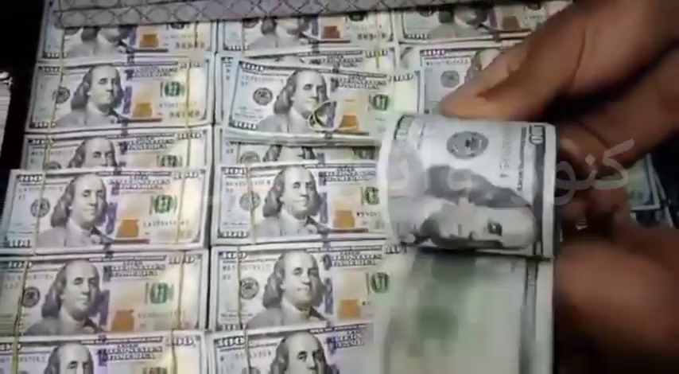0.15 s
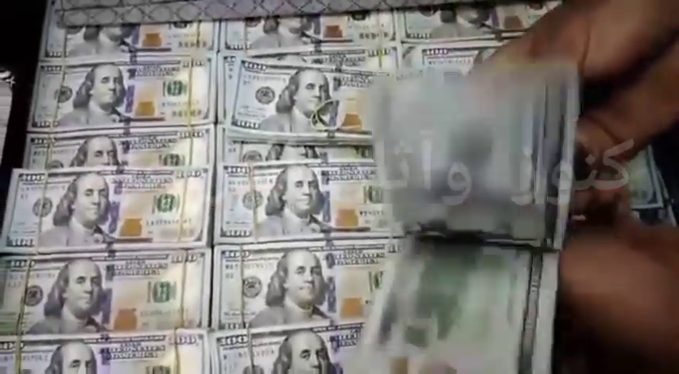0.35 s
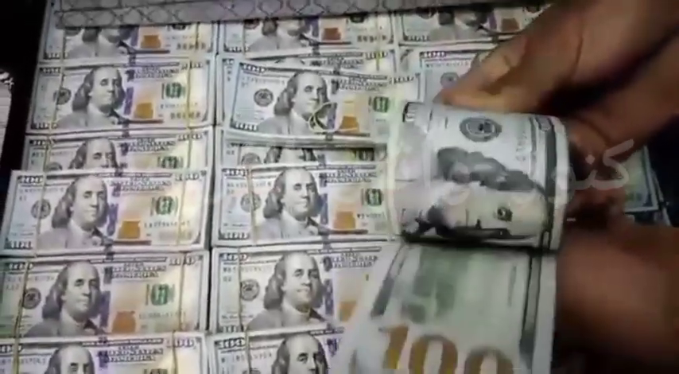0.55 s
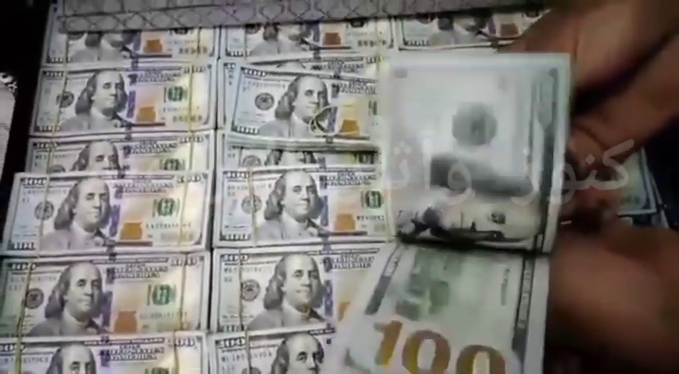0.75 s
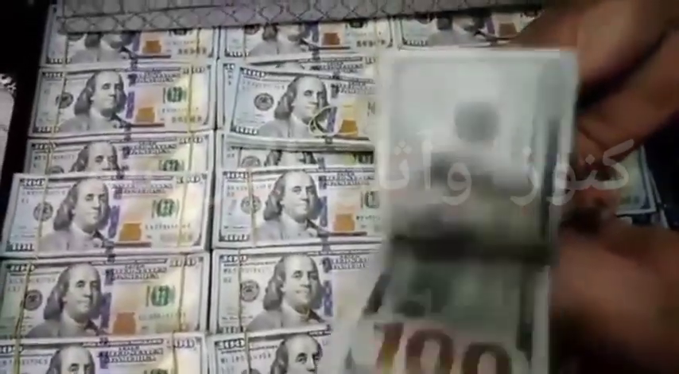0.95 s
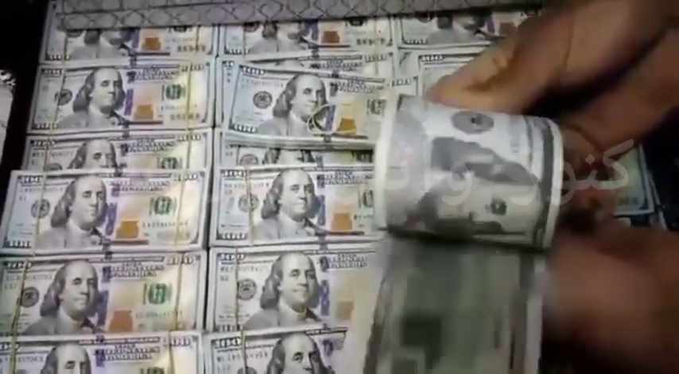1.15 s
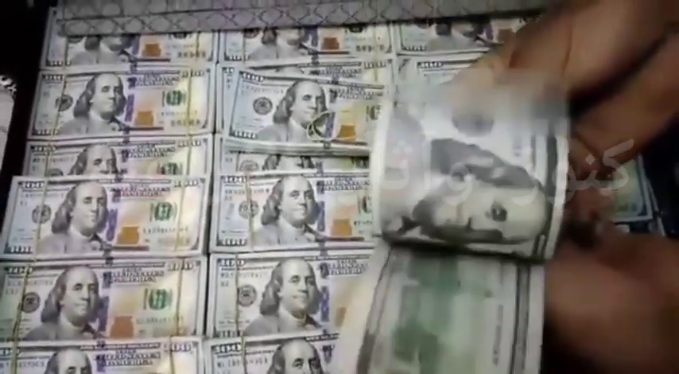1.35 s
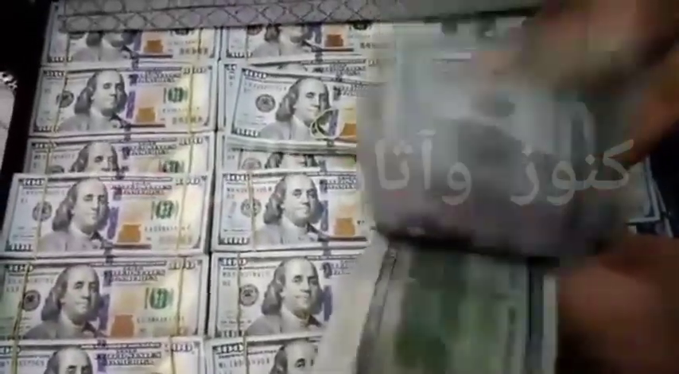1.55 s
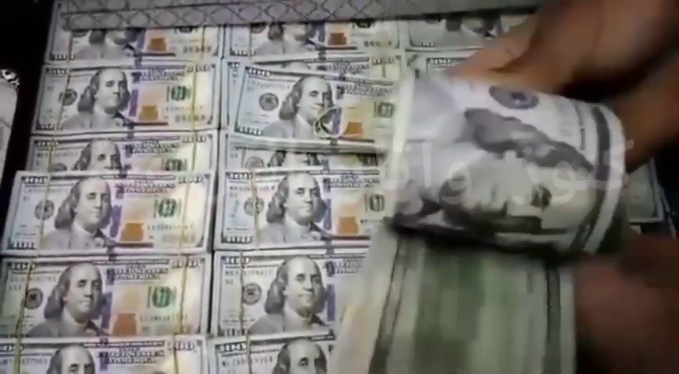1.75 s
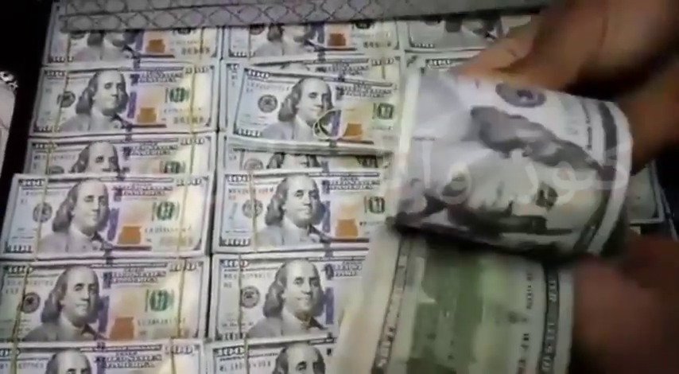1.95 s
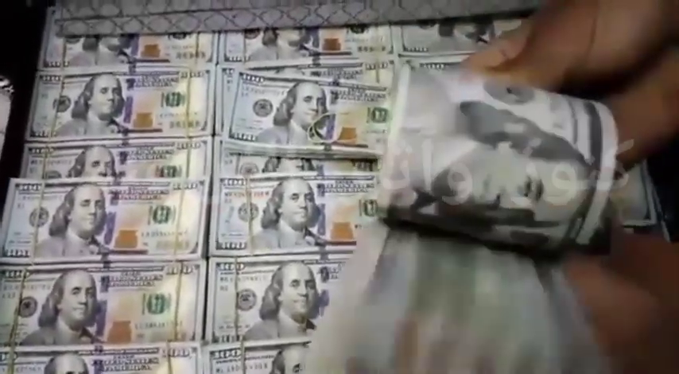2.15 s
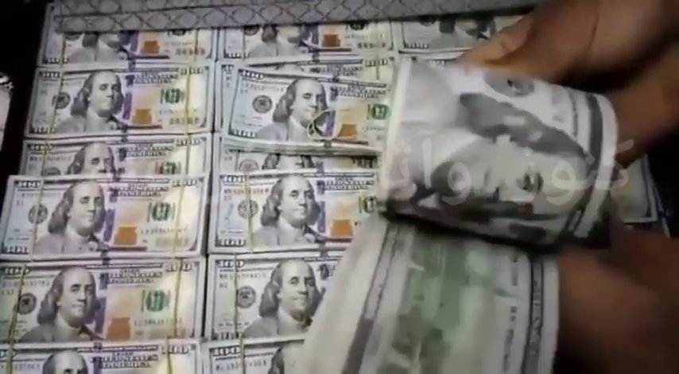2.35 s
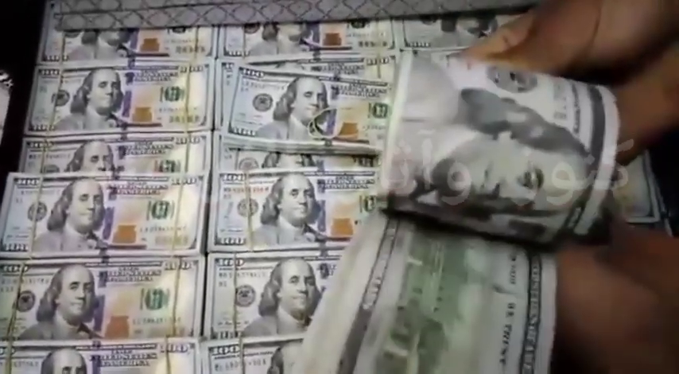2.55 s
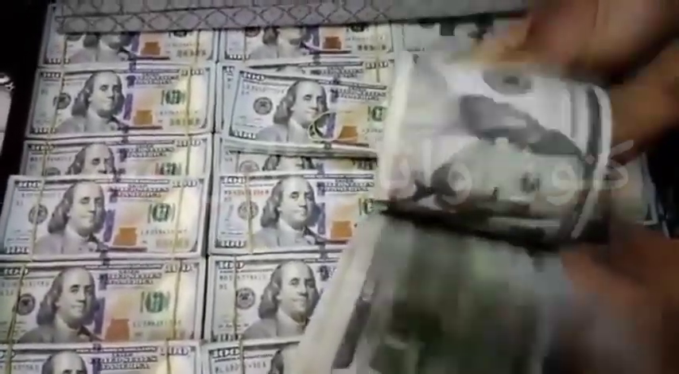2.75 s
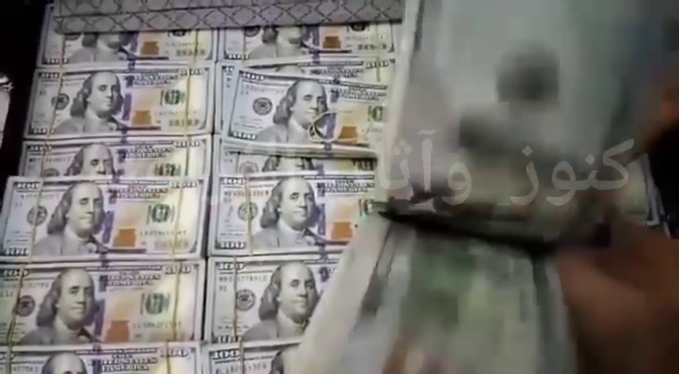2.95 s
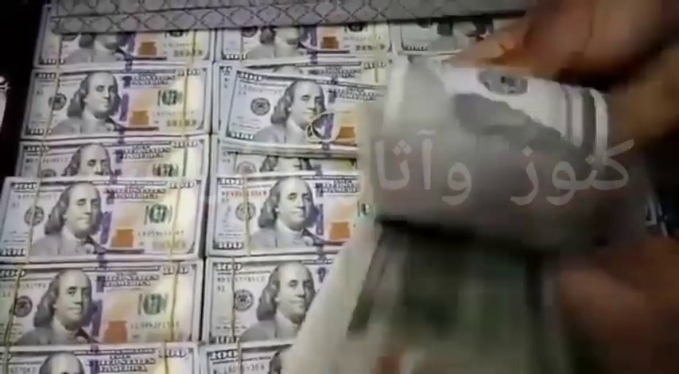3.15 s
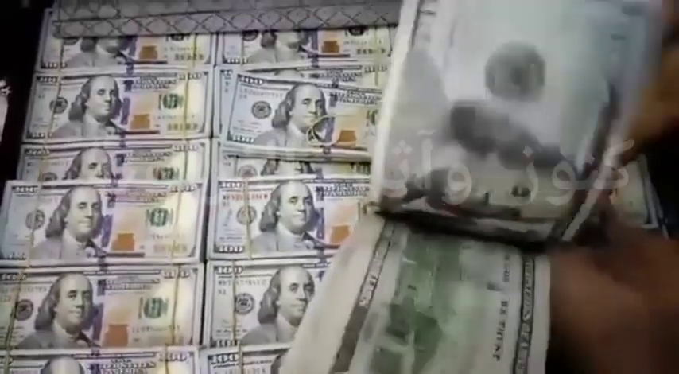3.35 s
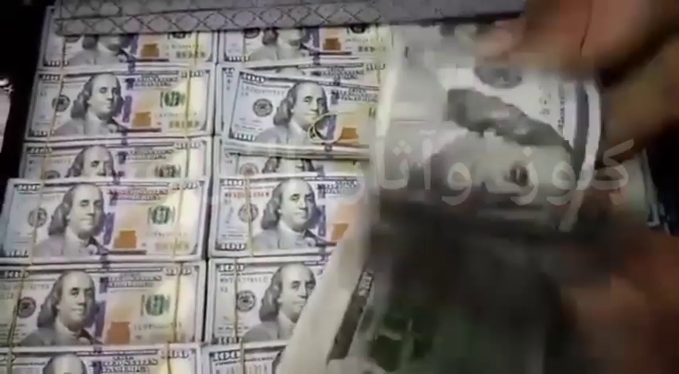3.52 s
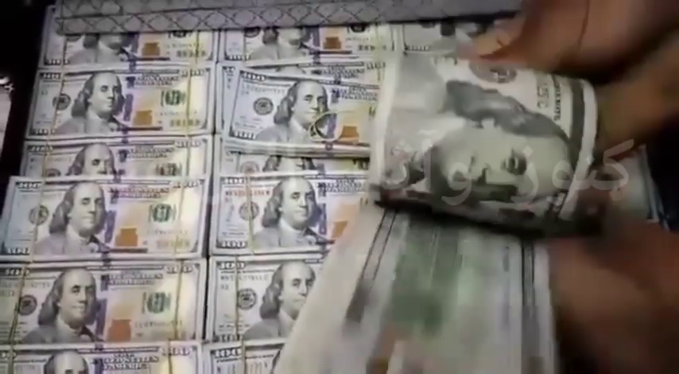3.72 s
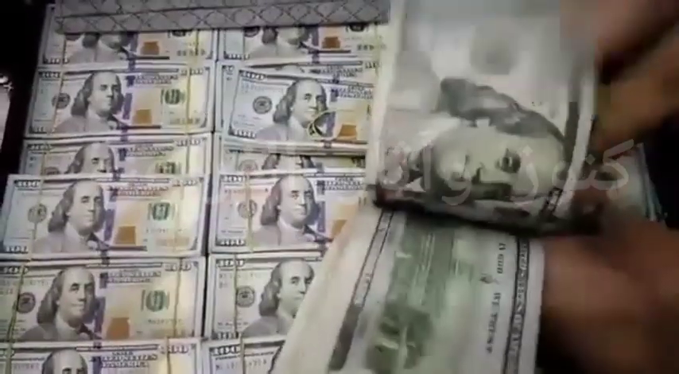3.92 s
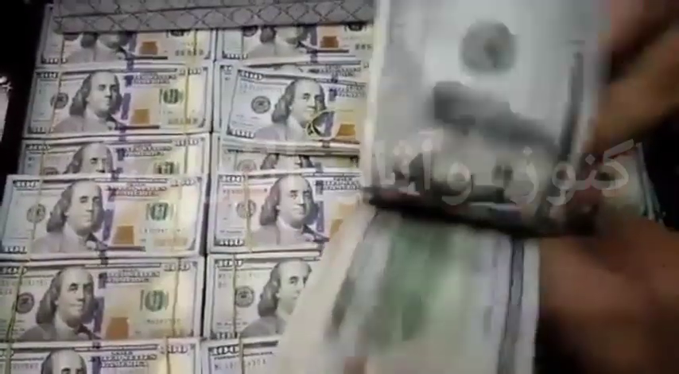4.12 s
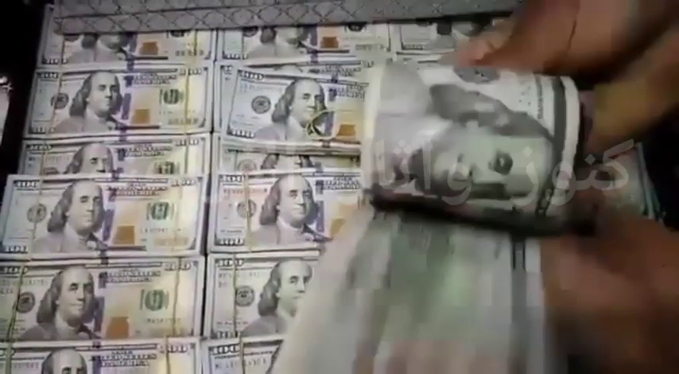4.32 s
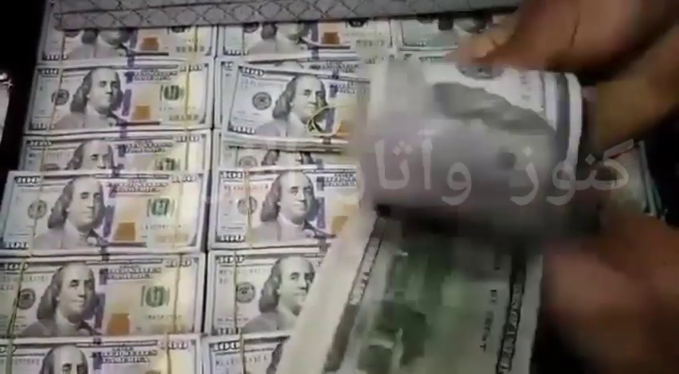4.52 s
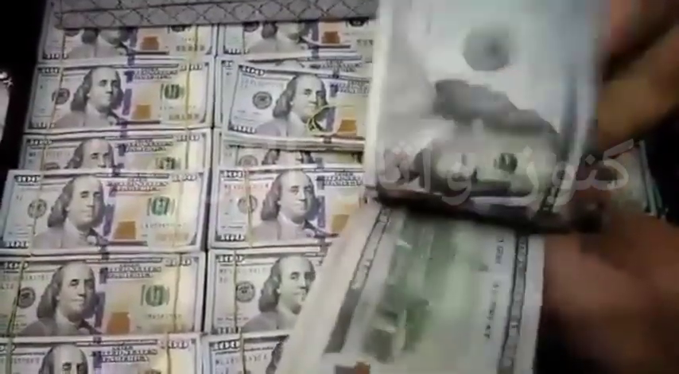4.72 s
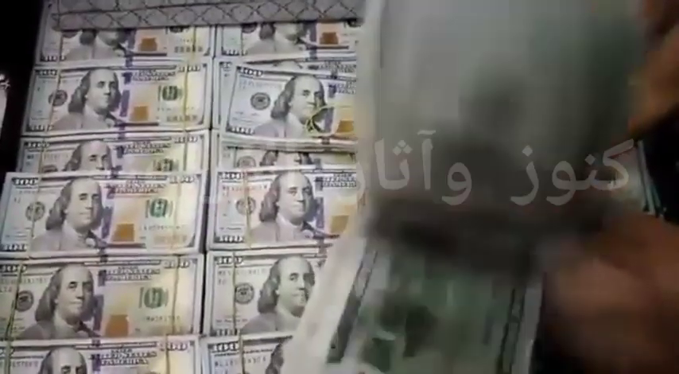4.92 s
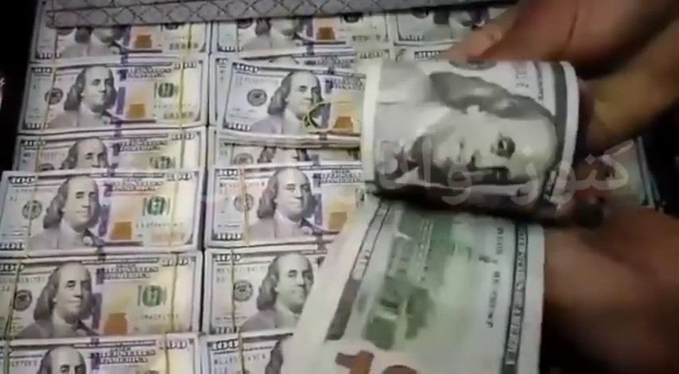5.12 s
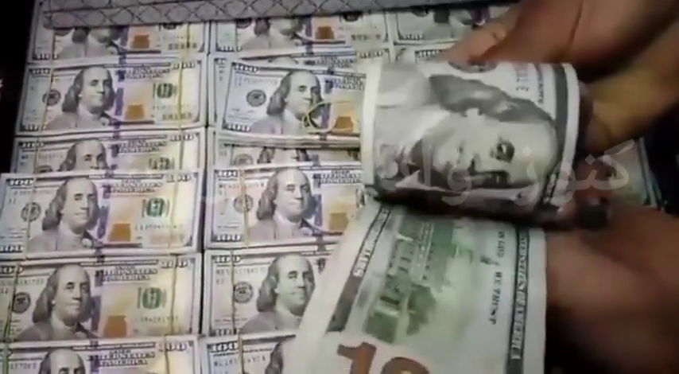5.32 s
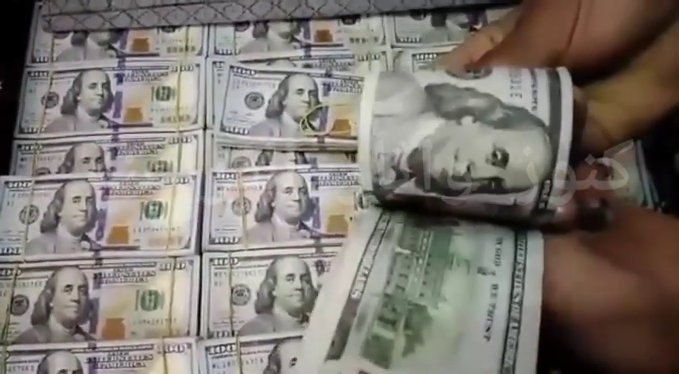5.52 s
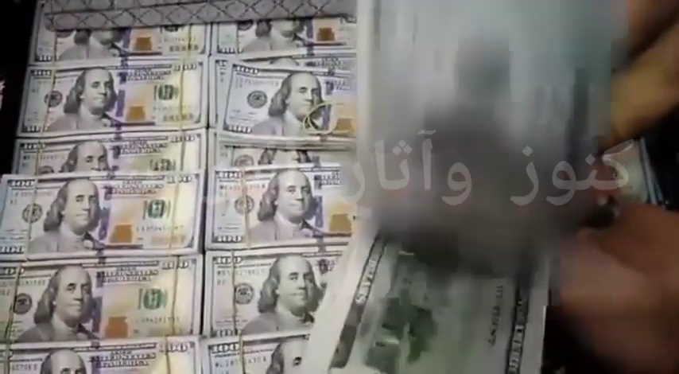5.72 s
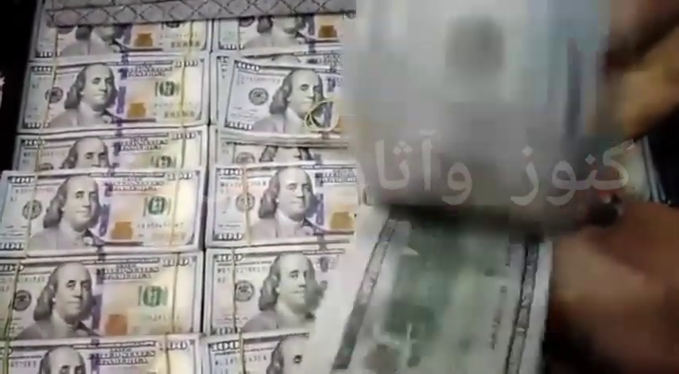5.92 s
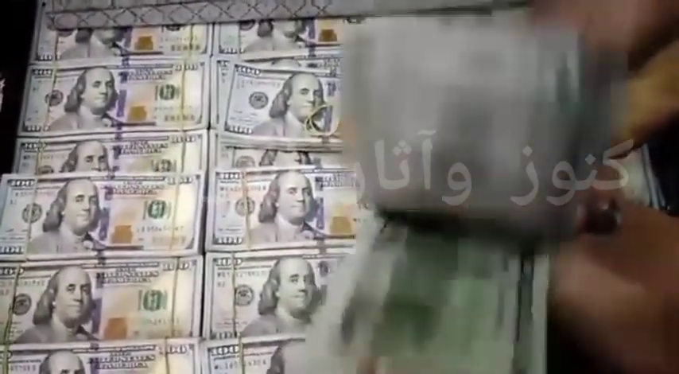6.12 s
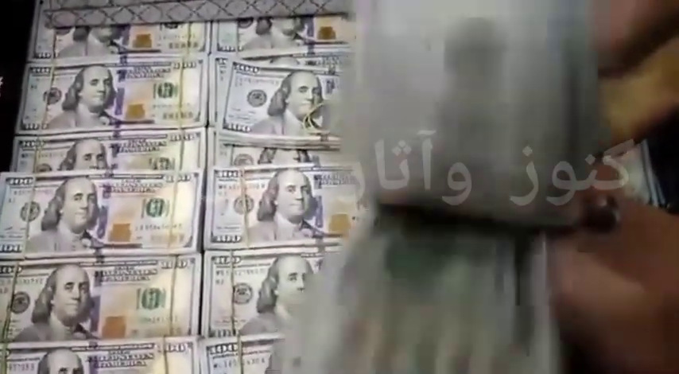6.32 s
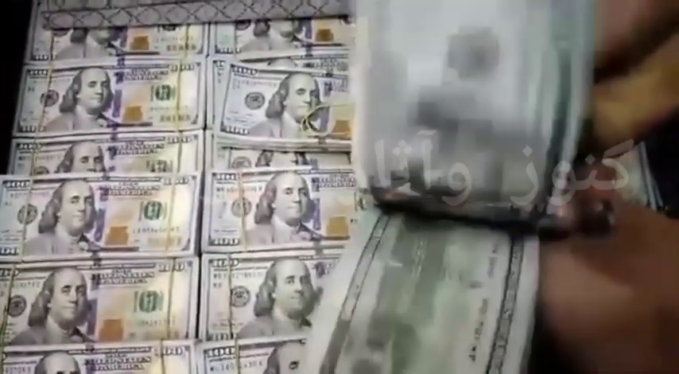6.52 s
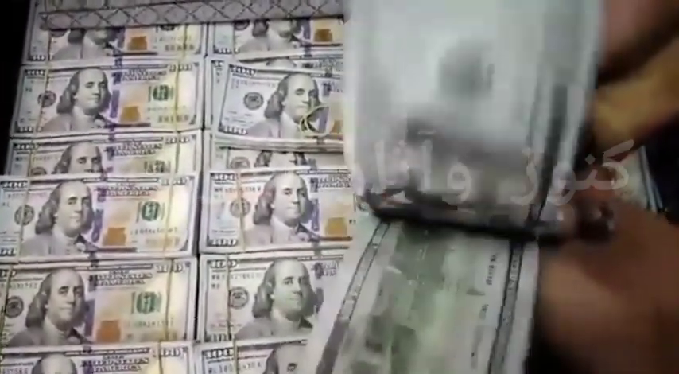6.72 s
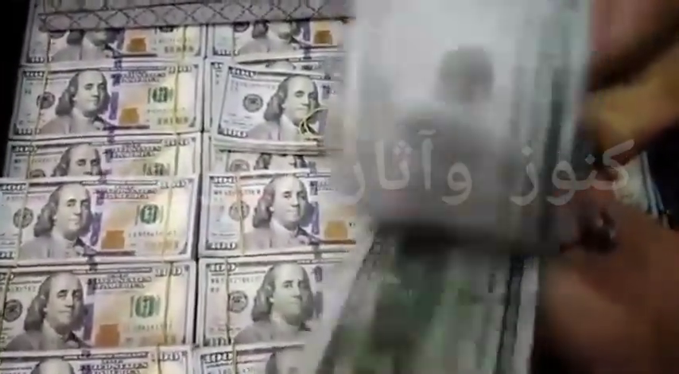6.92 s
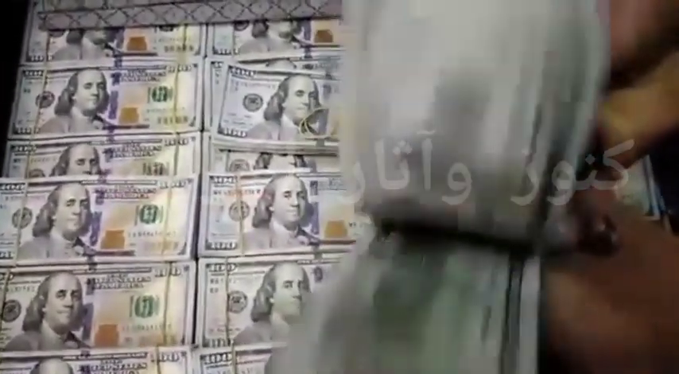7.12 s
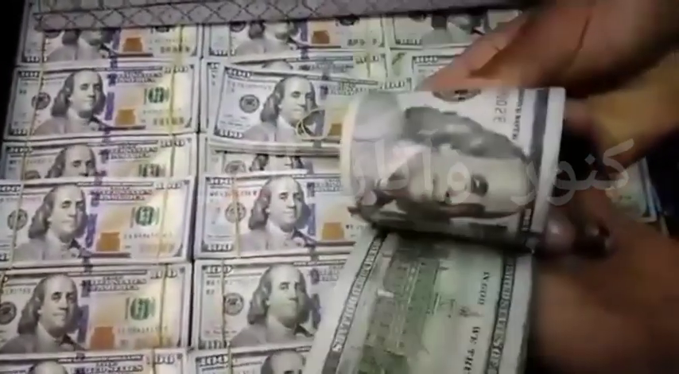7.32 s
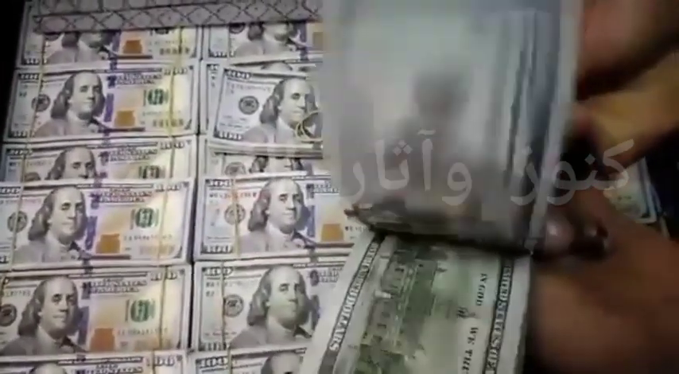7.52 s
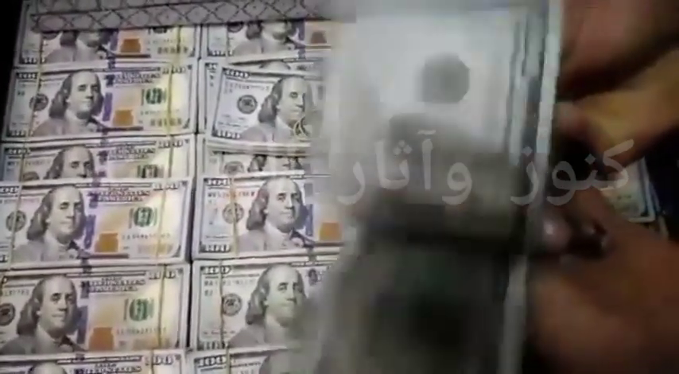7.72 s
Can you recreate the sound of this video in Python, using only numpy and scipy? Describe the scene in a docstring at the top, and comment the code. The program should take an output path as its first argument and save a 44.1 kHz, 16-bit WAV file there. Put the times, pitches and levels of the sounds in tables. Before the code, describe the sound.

Close, crisp flicking of paper money: grainy sliding rubs, ticking corners and springy snaps in uneven bursts, over faint low rumble and hiss.

```python
"""A small room, where hands thumb through a bent bundle of crisp banknotes, close to two microphone ports.
Each note slides under the thumb as grainy friction; its corners tick, and it springs free with a short snap,
a noise burst shaped by the resonances of the bent sheet. The bundle knocks in damped low modes and pushes
soft puffs of air. The room adds near reflections and a brief diffuse tail; beneath lie a low rumble in
filtered noise, a faint mains hum in beating sines and a steady hiss."""
import sys
import numpy as np
from scipy import signal
from scipy.fft import rfft, irfft, next_fast_len
from scipy.io import wavfile
from scipy.ndimage import uniform_filter1d

SR = 44100
rng = np.random.default_rng(int(sys.argv[2]) if len(sys.argv) > 2 else 0)


def generate_wav(sig):
    """Save sig (samples, or channels by samples) to the path in sys.argv[1] as 16-bit PCM at SR."""
    pcm = np.round(np.clip(np.atleast_2d(sig).T, -1, 1) * 32767).astype(np.int16)
    wavfile.write(sys.argv[1], SR, pcm)


N = 342200  # length in samples

# Steady air: (frequency [Hz], relative density [dB per Hz])
AIR_SPECTRUM = [(300, -1.5), (1500, -7), (9000, -8), (14000, -7.5)]
# Steady hum: (frequency [Hz], rms level before wavering [dB])
HUM_TONES = [(49, -79.5), (100, -70), (110, -71.5)]
# Octave of the hum, which comes and goes: (time [s], rms level before wavering [dB])
OCTAVE_LEVEL = [(.98, -88), (1.15, -66.5), (2.5, -67), (2.85, -60.5), (3.6, -85), (4.08, -61.5), (4.9, -62),
                (5.27, -85), (5.5, -67.5), (6.1, -64), (6.35, -83), (6.72, -61.5), (7.15, -63), (7.47, -79),
                (7.76, -66)]
OCTAVE_HZ = 200
# Low background: (time [s], level before trim [dB])
BACKGROUND_LEVEL = [(0, -63), (1, -63), (1.3, -55), (2.1, -63), (3.1, -57.5), (3.95, -61), (4.1, -59.5),
                    (5.13, -57.5), (5.28, -71.5), (5.43, -62.5), (6.3, -60.5), (6.75, -58), (7.76, -57.5)]
# Rumble: (frequency [Hz], relative density [dB per Hz])
RUMBLE_SPECTRUM = [(15, -24.5), (28, -14), (49, -11.5), (70, -6), (112, 5.5), (160, -2.5), (215, -2),
                   (280, -6.5), (420, -25), (700, -32.5), (2000, -32), (9000, -36.5), (14000, -55)]
# Puffs of air from the swinging bundle: (time [s], level before trim [dB])
AIR_PUFFS = [(.19, -60), (.47, -62.5), (1.106, -52.5), (1.251, -61), (1.8, -55), (2.211, -64.5),
             (2.798, -58), (3.25, -61.5), (6.14, -58.5), (7.13, -57), (7.76, -53.5)]
PUFF_S = 0.025  # half-width of every puff
# Skin on the bundle: (frequency [Hz], relative density [dB per Hz])
SKIN_SPECTRUM = [(150, -37.5), (240, -4.5), (340, 2.5), (430, -7), (560, -23), (900, -48)]
# Reverberation: (frequency [Hz], time to decay by 60 dB [s])
ROOM_DECAY = [(200, 0.81), (800, 0.31), (2500, 0.49), (6000, 0.42), (11000, 0.53)]
# Nearby surfaces: (delay [s], level [dB])
REFLECTIONS = [(0.0105, -26.5), (0.013, -23), (0.018, -32)]
# Dull knocks of the bundle against the hand: (time [s], level [dB], middle mode [Hz])
KNOCKS = [(0.19, -37, 295), (1.098, -35.5, 160), (1.258, -43, 150), (1.635, -39, 332), (2.168, -46.5, 378),
          (2.79, -47.5, 228), (5.421, -53.5, 210), (5.618, -54, 230)]
# The thumb pushes a note over the next:
# (start [s], length [s], hiss before trim [dB], sheet body before trim [dB], skin before trim [dB])
THUMB_STROKES = [(-.02, 0.11, -55.5, -75, -79), (0.12, 0.051, -44, -42.5, -58.5),
                 (0.2, 0.18, -55, -63, -65), (0.416, 0.13, -58, -63.5, -60),
                 (0.707, 0.015, -63, -74, -71.5), (0.833, 0.25, -62.5, -80, -67.5),
                 (1.07, 0.23, -47.5, -50, -53.5), (1.266, 0.25, -50, -55.5, -58.5),
                 (1.585, 0.08, -46, -44.5, -53.5), (1.703, 0.086, -56, -53, -61.5),
                 (2, 0.16, -68, -70.5, -87), (2.178, 0.039, -75, -61.5, -59.5),
                 (2.38, 0.69, -63, -71.5, -85), (2.762, 0.1, -56, -53, -62),
                 (3.009, 0.29, -57.5, -51.5, -63), (3.206, 0.42, -55, -59.5, -68.5),
                 (3.512, 0.23, -48, -49.5, -61.5), (3.672, 0.25, -51, -52.5, -59),
                 (3.994, 0.26, -59, -59, -73.5), (4.227, 0.23, -48.5, -52, -57.5),
                 (4.5, 0.12, -56, -58.5, -67), (4.684, 0.12, -55, -74, -67), (4.837, 0.056, -50, -54, -64),
                 (4.984, 0.16, -76, -60.5, -68), (5.272, 0.11, -74.5, -95, -82),
                 (5.516, 0.094, -70.5, -76, -89.5), (5.59, 0.11, -64.5, -72, -79.5),
                 (5.877, 0.04, -48.5, -65, -71), (6.019, 0.3, -64, -53, -75),
                 (6.339, 0.15, -56, -58.5, -63), (6.413, 0.14, -49.5, -53, -60),
                 (6.588, 0.17, -57.5, -59, -61), (6.743, 0.13, -56, -58, -60),
                 (6.882, 0.23, -60.5, -89, -65.5), (7.06, 0.21, -46, -56, -64.5),
                 (7.289, .17, -50.5, -56, -54.5), (7.483, 0.27, -62, -68.5, -59.5),
                 (7.711, 0.063, -43, -44.5, -66)]
# Each stroke takes hold over a share of its length, eases off as the note slips, and dies away
GRIP_SHARE, EASE_DB_PER_S, RELEASE_DB_PER_S = 0.13, -11, -260
# Rubbed sheet, lower and upper part: (frequency [Hz], relative density [dB per Hz])
SHEET_BODY_SPECTRUM = [(200, -9.5), (480, -8), (700, -3.5), (950, -6), (1300, 2), (1900, 5), (2700, 0.5),
                       (3800, -23.5), (7000, -42)]
SHEET_HISS_SPECTRUM = [(1500, -27.5), (3200, -3.5), (4200, -7), (5200, 1.5), (7300, -1.5), (10000, -2.5),
                       (15000, 5.5)]
# Notes springing free: (time [s], flap before trim [dB], crack [dB], crisp before trim [dB],
# rise time constant [s], left minus right [dB], main resonance [Hz], second resonance [Hz])
NOTE_SNAPS = [(0.1307, -45, -41.5, -42.5, 0.0058, -1, 1950, 6650),
              (0.159, -42, -38, -45, 0.0054, -2, 6800, 990),
              (0.176, -40.5, -39.5, -38, 0.00068, 1, 7200, 840),
              (0.1895, -39.5, -56, -51, 0.00044, -6, 710, 6030),
              (0.4552, -56, -37, -44, 0.0022, -5.5, 3230.0, 6700),
              (0.889, -68, -48, -80, 0.0044, 4, 2670, 8510),
              (1.0337, -46.5, -48, -26, 0.00045, 8, 7000, 12400),
              (1.0364, -43.5, -25, -19.5, 0.00036, -16, 4350, 9900),
              (1.053, -58, -39, -59, 0.0018, 10, 4050, 7800),
              (1.086, -48, -38, -42, 0.0044, -2, 4800, 2700),
              (1.224, -50, -38, -34.5, 0.0011, -2, 7100, 6000),
              (1.2925, -56, -34.5, -37, 0.0036, -10.0, 6300, 3800),
              (1.3103, -45.5, -33.5, -29.5, 0.0053, -4, 4670, 5450),
              (1.468, -61, -48.5, -62.0, 0.0021, 1, 1510.0, 3300),
              (1.49, -70, -42.5, -45, 0.0033, 0, 6700, 1640),
              (1.497, -37.5, -55, -44, 0.00063, -2.5, 850, 6440),
              (1.5722, -45.5, -29.5, -32, 0.0019, -7, 4000, 1730),
              (1.636, -37.5, -42, -42.5, 0.0013, -1.5, 712, 1490),
              (1.643, -43, -38, -44, 0.0022, -3, 1890, 715),
              (1.720, -42.5, -42, -44.5, 0.0017, -2, 5200, 690),
              (1.7922, -47.5, -33, -39.5, 0.0015, -2, 5570, 3800),
              (2.1708, -44, -37, -48.5, 0.00074, 2, 1760.0, 2450),
              (2.729, -67.5, -50.5, -61, 0.007, -3, 1955, 1400),
              (2.7837, -43, -37, -40, 0.0068, -4, 6200, 3530),
              (2.7944, -40.5, -30, -41.5, 0.0023, -2, 2580, 4600),
              (3.0702, -50, -31, -39, 0.0016, -5.5, 8300, 3040),
              (3.1165, -41.5, -38.5, -58, 0.0037, 0.5, 2660, 1940),
              (3.1883, -51, -48, -52, 0.00087, -4, 4700, 2130),
              (3.2195, -44.5, -42, -67, 0.0018, 2, 2300, 960),
              (3.283, -49.5, -39, -43.5, 0.0044, -7, 2880, 5870),
              (3.528, -56, -49.5, -67.0, 0.002, -7, 3400, 2240),
              (3.548, -48, -33.5, -23.5, 0.0014, -2.5, 7700.0, 5860),
              (3.702, -41.5, -26.5, -24.5, 0.0018, -4.5, 6800, 8900),
              (3.731, -53, -38, -51, 0.0021, 6, 5210.0, 2710),
              (3.7438, -47, -33, -32.5, 0.0056, 1, 5940, 7400),
              (3.8697, -54, -45, -65, 0.0071, -2.5, 3040, 6090),
              (4.0122, -55.5, -40, -33.5, 0.0012, -7, 6700, 3880),
              (4.031, -53, -49, -48, 0.0016, -3, 1000, 6400),
              (4.0614, -53, -38, -43.5, 0.0096, -4, 5960, 2350),
              (4.1491, -78, -43, -36.5, 0.0015, 0, 6360, 9200),
              (4.2307, -48.5, -35.5, -32.5, 0.0032, -3, 6830, 5400),
              (4.3195, -43, -46, -57, 0.0006, 3.5, 1780, 3000),
              (4.4102, -58, -35, -36.5, 0.0018, -6.5, 6800, 1750),
              (4.458, -75, -42.5, -43, 0.024, 3, 5430.0, 2770),
              (4.5523, -39.5, -42, -60, 0.001, 3, 1640, 3530),
              (4.72, -52, -46, -53, 0.0054, -4, 2070.0, 2870),
              (4.7388, -56, -43, -43, 0.00098, -5, 6960, 5300),
              (4.859, -49.5, -55, -54, 0.0022, -5, 6540, 1080),
              (4.887, -57, -38, -49, 0.0014, -1, 3100, 4180),
              (4.991, -50, -34, -34, 0.0018, -5.5, 6500, 4250),
              (5.0909, -62, -44, -53, 0.0019, 2, 4630, 1290), (5.103, -52, -63, -57, 0.0029, 1, 1500, 3210),
              (5.8773, -57.5, -44.5, -48.5, 0.011, -7, 2077, 3730),
              (5.9157, -65, -41.0, -44.5, 0.0015, -6, 2980, 7400),
              (6.0462, -52.5, -42, -46.5, 0.0045, -1, 4670, 2950),
              (6.1008, -74, -34.5, -37.5, 0.0014, -5, 5270, 3130),
              (6.1358, -49.5, -40.5, -44.5, 0.0023, -5, 8140, 2630),
              (6.1742, -71, -40, -40, 0.0019, -2.5, 7240.0, 3500),
              (6.3735, -68, -43.5, -49, 0.0025, -2, 5160, 6630),
              (6.463, -76, -46.5, -56, 0.003, -1, 2540, 3570),
              (6.4992, -50, -39.5, -43, 0.0036, 2.5, 6700, 2870),
              (6.7515, -52, -37, -41, 0.0041, 0, 5800, 3070),
              (6.763, -66, -46.5, -46.5, 0.0022, -3, 2540, 8010),
              (7.0314, -75, -55, -38.5, 0.0005, -10, 7100, 5500),
              (7.091, -57, -36.5, -45.5, 0.0016, -2.5, 3200, 6360),
              (7.1385, -73, -43.5, -44, 0.0063, 3, 6540, 3370),
              (7.1865, -77, -42.5, -47, 0.0016, -7, 2250.0, 3120),
              (7.2495, -83, -44.5, -46.5, 0.0012, 0, 5170, 7700),
              (7.333, -53.5, -41, -42, 0.012, -0.5, 2520, 3200),
              (7.7122, -52, -36, -31, 0.001, -5, 5540, 7540)]
FLAP_HZ, CRACK_HZ, CRISP_HZ = 600, 1500, 4500  # usual lower edges of the three bands
# Low-pass limit of each snap burst, raised for crisp levels above HARD_DB
TOP_HZ, HARD_DB, TOP_HZ_PER_DB = 10300, -30, 598
MIN_WIDTH_HZ = 650  # narrowest resonance of a sheet
# Corners ticking past the thumb: (time [s], crisp before trim [dB], left minus right [dB], resonance [Hz])
CORNER_TICKS = [(0.066, -49, -2, 9500), (0.732, -50.5, -2, 9200), (0.96, -54.5, -7, 9840),
                (1.238, -44, 3, 5500), (1.381, -46, 2, 8850), (1.589, -49, 5, 6090),
                (2.021, -51.5, 1.5, 8100), (2.096, -63.5, 1.5, 7100), (2.61, -56, 0, 8000),
                (3.05, -41.5, 7, 6300), (3.245, -56, -2, 5500), (3.321, -48, 2, 7950),
                (3.396, -53.5, 0, 7560), (3.449, -55.5, -4, 1550), (3.489, -51, 7, 7750),
                (4.048, -50, 3, 6600), (4.422, -52, 0, 6000), (4.874, -40, 0, 7900),
                (5.6207, -51.5, 6, 6550), (5.6748, -46.5, -0.5, 6970), (5.8354, -49, -0.5, 7000),
                (6.065, -51, -3, 7500), (6.078, -53, -2, 6180), (6.248, -50.5, -15, 7140),
                (6.258, -59, -3, 3000), (6.3135, -41.5, -1, 6460), (6.4938, -43.5, -2, 5500),
                (6.511, -46.5, -7, 8480), (6.696, -49.5, -1, 7400), (6.732, -48, -22, 3340),
                (6.872, -48.5, -7, 6300), (6.92, -52.5, -5, 9840), (6.9847, -49, -7, 6960),
                (6.999, -50.5, -7, 9800), (7.043, -57, -9, 7050), (7.148, -56, -1, 4900),
                (7.208, -50, 3, 6500), (7.222, -45, -2, 7700), (7.225, -53, -6, 6800),
                (7.347, -50, 12, 4500), (7.507, -50.5, -3, 6950), (7.587, -45, -3.5, 7740),
                (7.66, -48, -3, 6650), (7.685, -52, -3, 5620)]
# Every tick is a small, thin snap: rise time constant, then flap and crack relative to its level
TICK_S, TICK_FLAP_DB, TICK_CRACK_DB = 0.0024, -26, -12
# Likeness of the two ports: (frequency [Hz], correlation [0 to 1])
PORT_LIKENESS = [(50, 0.82), (300, 0.74), (1000, 0.29), (2200, 0.58), (4000, 0.12), (12000, 0.18)]
# Colour of each microphone port: (frequency [Hz], gain [dB])
LEFT_COLOUR = [(300, -1), (2200, -1.5), (4200, -4), (6000, -4.5), (7900, 1), (8400, -4), (9200, 1.5),
               (10700, -5), (11200, -17.5), (12200, -21.5), (12800, -30), (15500, -44.5)]
RIGHT_COLOUR = [(300, -1), (1000, -2.5), (2200, -7.5), (3000, -1.5), (4200, -5), (6000, -4.5), (7300, 0.5),
                (8000, -0.5), (8400, -17), (9300, -13), (10700, -14), (11300, -21.5), (12300, -28),
                (14000, -37.5), (15500, -53)]
EDGE_HZ = 15600  # upper limit of the band


def gain_of(db):
    """A level in decibels is twenty times the logarithm of an amplitude ratio."""
    return 10 ** (np.asarray(db) / 20)


def evened(x):
    """Division by the root mean square brings a signal to unit level."""
    return x / np.sqrt(np.mean(x ** 2) + 1e-20)


def read(points, hz):
    """A spectrum is interpolated on a logarithmic frequency axis."""
    f, value = np.transpose(points)
    return np.interp(np.log(hz + 1), np.log(f + 1), value)


def level_curve(rows):
    """A slowly varying level in dB is interpolated linearly between its times."""
    s, db = np.transpose(rows)
    return np.interp(np.arange(N) / SR, s, db)


def noise():
    """White noise has equal power at every frequency; the two channels are independent."""
    return rng.standard_normal((2, N))


def bumps(shape, spans):
    """Moving averages smooth noise into a field of rms 1; spans are bump sizes along each axis."""
    field = rng.standard_normal(shape)
    for axis, span in enumerate(spans):
        for _ in range(2):
            field = uniform_filter1d(field, span, axis, mode="wrap")
    return evened(field)


def add(mix, s, sound):
    """Superposition: a sound starting at time s adds to the pressure already there."""
    part = mix[:, max(round(s * SR), 0):][:, :sound.shape[1]]
    part += sound[:, :part.shape[1]]


def colour(x, points):
    """A linear filter multiplies the spectrum by a gain curve given in dB."""
    size = next_fast_len(N + 4096)
    gain = gain_of(read(points, np.fft.rfftfreq(size, 1 / SR)))
    return irfft(rfft(x, size) * gain, size)[..., :N]


def paired(z, lag=0.00015):
    """Coherence: the ports share most bass but little treble; the left one hears it later by lag [s]."""
    size = next_fast_len(z.shape[1], True)
    hz = np.fft.rfftfreq(size, 1 / SR)
    own, right = rfft(z, size)
    same = np.clip(read(PORT_LIKENESS, hz), 0, 1)
    left = same * right + np.sqrt(1 - same ** 2) * own
    left = left * np.exp(-2j * np.pi * hz * lag)
    return irfft(np.array([left, right]), size)[:, :z.shape[1]]


def steady_air(air_db=-87):
    """Stationary filtered noise is heard as a faint hiss that never stops."""
    return evened(colour(noise(), AIR_SPECTRUM)) * gain_of(air_db)


def hum(waver=0.13):
    """Beats: a faint mains hum and a second tone just above it interfere; the octave swells and sinks."""
    t = np.arange(N) / SR
    out = np.zeros(N)
    for hz, db in HUM_TONES + [(OCTAVE_HZ, level_curve(OCTAVE_LEVEL))]:
        drift = np.interp(t, np.linspace(0, t[-1], num=40), rng.standard_normal(size=40))
        peak = gain_of(db) * np.sqrt(2) * (1 + waver * drift)
        out += peak * np.sin(2 * np.pi * (hz * t + rng.random()))
    return out


def rumble(noise_db=-1.5, puff_db=4.5):
    """Independent noises add in power: puffs of air swell over the low background."""
    t = np.arange(N) / SR
    puffs = sum(gain_of(db + puff_db) / (1 + ((t - s) / PUFF_S) ** 2) for s, db in AIR_PUFFS)
    background = gain_of(level_curve(BACKGROUND_LEVEL) + noise_db)
    return evened(colour(paired(noise()), RUMBLE_SPECTRUM)) * np.hypot(background, puffs)


def room(x, tail_db=-10, gap_s=0.0053, build_s=0.0029):
    """Reverberation: a few near reflections and a diffuse tail that decays band by band."""
    hz, t, z = signal.stft(rng.standard_normal((2, SR // 2)), SR, nperseg=256)
    decay_db = -60 * t / read(ROOM_DECAY, hz)[:, None]
    tail = signal.istft(z * gain_of(decay_db), SR, nperseg=256)[1]
    tail *= np.clip((np.arange(tail.shape[1]) / SR - gap_s) / build_s, 0, 1)
    tail *= gain_of(tail_db) / np.linalg.norm(tail[0])
    for delay, db in REFLECTIONS:
        scatter = rng.standard_normal((2, 128)) * np.exp(-np.arange(128) / 25)
        scatter /= np.linalg.norm(scatter, axis=1, keepdims=True)
        add(tail, delay, gain_of(db) * scatter)
    return signal.fftconvolve(x, tail, axes=1)[:, :N]


def thumps(rise_s=0.0031, decay_s=0.0059, spread=1.595):
    """Damped oscillation: a knock excites three low modes of the thick bundle, a ratio of spread apart."""
    t = np.arange(SR // 10) / SR
    envelope = (1 - np.exp(-t / rise_s)) * np.exp(-t / decay_s)
    out = np.zeros((2, N))
    for s, db, hz in KNOCKS:
        modes = sum(np.sin(2 * np.pi * (hz * spread ** k * t + rng.random())) for k in (-1, 0, 1))
        add(out, s, (gain_of(db) * modes * envelope)[None])
    return out


def stroke_levels():
    """Strokes add in power; hiss, sheet and skin share one envelope of grip, ease and release."""
    t, power = np.arange(N) / SR, np.zeros((3, N))
    for start, length, *levels_db in THUMB_STROKES:
        near = (t > start) & (t < start + length + .5)
        age = t[near] - start
        grip = np.minimum(age / (GRIP_SHARE * length), 1)
        fade_db = EASE_DB_PER_S * age + RELEASE_DB_PER_S * np.maximum(age - length, 0)
        power[:, near] += np.outer(gain_of(levels_db), grip * gain_of(fade_db)) ** 2
    return np.sqrt(power)


def skin_brush(skin_gain, brush_db=-2.5):
    """Friction of skin over the thick of the bundle gives dull noise, stronger at the left port."""
    skin = evened(colour(paired(noise()), SKIN_SPECTRUM)) * skin_gain * gain_of(brush_db)
    return skin * gain_of([[1.5], [-1.5]])


def friction(per_s, spread_db, smooth):
    """Stick-slip: paper fibres catch and slip in tiny ticks of uneven size and pitch over a fine hiss."""
    count = int(per_s * N / SR)
    when, pitch, size, side, turn = rng.random((5, count, 1))
    t = np.arange(160) / SR
    hz = 900 + 10000 * pitch
    ticks = np.sin(2 * np.pi * (hz * t + turn)) * np.exp(-hz * t / 2) * np.sqrt(hz)  # a few cycles each
    ticks *= gain_of(spread_db * np.minimum(-np.log1p(-size), 4))  # many small, few large
    at = ((when * (N - len(t))).astype(int) + np.arange(len(t))).ravel()
    ports = [np.bincount(at, (ticks * np.sqrt(share)).ravel(), N) for share in (side, 1 - side)]
    return evened(evened(np.array(ports)) + smooth * paired(noise()))


def patchy(x, depth_db):
    """Random patches: the noise varies irregularly over frequency and time, partly alike at both ports."""
    z = signal.stft(x, nperseg=512, noverlap=384)[2]
    shared, own = bumps(z.shape[1:], (3, 7)), bumps(z.shape, (1, 2, 14))  # both ports; each port
    z = z * gain_of(depth_db * np.minimum(.8 * shared + .6 * own, .8))
    return evened(signal.istft(z, nperseg=512, noverlap=384)[1][:, :N])


def slide(hiss_gain, body_gain, hiss_db=-1.5, body_db=-4.0):
    """Friction as excitation: note rubbing on note hisses and shakes the whole sheet."""
    rub = patchy(friction(per_s=3500, spread_db=3.5, smooth=1), depth_db=7)
    hiss = evened(colour(rub, SHEET_HISS_SPECTRUM)) * hiss_gain * gain_of(hiss_db)
    body = evened(colour(rub, SHEET_BODY_SPECTRUM)) * body_gain * gain_of(body_db)
    return hiss + body


def sheet(x, main_hz, second_hz, main_db=9, second_db=7, sharpness=3.8):
    """Causality: a bent note, with two strong resonances and chance notches, rings only after the blow."""
    hz = np.fft.rfftfreq(x.shape[1], 1 / SR)
    notches_db = 7 * np.minimum(bumps(len(hz), [12]), .5)

    def resonance(f):
        width_hz = max(f / sharpness, MIN_WIDTH_HZ)
        return 1 / (1 + (2 * (hz - f) / width_hz) ** 2)

    peaks_db = np.maximum(main_db * resonance(main_hz), second_db * resonance(second_hz))
    log_gain = np.log(gain_of(peaks_db + notches_db))
    # minimum phase: the Hilbert transform of the log gain
    causal = np.exp(signal.hilbert(np.r_[log_gain, log_gain[-2:0:-1]]).conj())[:len(hz)]
    return irfft(rfft(x) * causal)


def bandpass(low_hz, high_hz, order):
    """A Butterworth band filter passes its band without ripple."""
    return signal.butter(order, [low_hz, high_hz], "band", fs=SR, output="sos")


def snaps(drag_s=0.0023, flap_db=-1, crisp_db=-1.0):
    """Elastic release: a note drags off the thumb, whips straight and shivers in the resonances of its bend."""
    size, window_s = 2048, .01  # samples in a burst; span over which levels are rms
    shiver, shiver_s = .4, .0038
    grain_db, whip, whip_s, fall = 1.5, 1.0, .00055, 1.5  # fall: decay relative to rise
    t = (np.arange(size) - size // 2) / SR
    crack_band = bandpass(CRACK_HZ, CRISP_HZ, 3)
    crisp_band = signal.butter(3, CRISP_HZ, "high", fs=SR, output="sos")
    edge = whip * np.exp(-abs(t) / whip_s) * np.array([[.3], [1]])  # the free edge faces the right port
    ticks = [(s, db + TICK_FLAP_DB, db + TICK_CRACK_DB, db, TICK_S, pan_db, hz, hz)
             for s, db, pan_db, hz in CORNER_TICKS]
    out = np.zeros((2, N))
    for s, flap, crack, crisp, rise_s, pan_db, main_hz, second_hz in list(NOTE_SNAPS) + ticks:
        shape = np.exp(-abs(t) / (max(rise_s, whip_s) * np.where(t < 0, 1, fall)))
        shape += shiver * np.exp(-abs(t) / np.where(t < 0, drag_s, shiver_s))
        grains = gain_of(grain_db * bumps(size, [14]))
        blow = paired(rng.standard_normal((2, size)) * (shape + edge) * grains)
        burst = sheet(blow, main_hz, second_hz)
        top_hz = min(TOP_HZ + TOP_HZ_PER_DB * max(crisp - HARD_DB, 0), EDGE_HZ)
        burst = signal.sosfilt(signal.butter(3, top_hz, fs=SR, output="sos"), burst)
        low_hz = min(FLAP_HZ, main_hz * 2 / 3)  # a slack note flaps lower
        flap_band = bandpass(low_hz, low_hz * CRACK_HZ / FLAP_HZ, 2)
        levels = gain_of([flap + flap_db, crack, crisp + crisp_db])
        snap = np.zeros((2, size))
        for level, band in zip(levels, [flap_band, crack_band, crisp_band]):
            snap += level * np.array([evened(port) for port in signal.sosfilt(band, burst)])
        sides = evened(gain_of([[pan_db / 2], [-pan_db / 2]]))
        add(out, s + t[0], snap * sides * np.sqrt(window_s * SR / size))
    return out


def scene():
    """Superposition of background, paper and its echo; the hands partly shield the room from the rubbing."""
    hiss_gain, body_gain, skin_gain = stroke_levels()
    background = steady_air() + hum() + rumble()
    rustle = slide(hiss_gain, body_gain)
    flicks = snaps()
    echo = room(flicks + .55 * rustle)
    return background + echo + thumps() + skin_brush(skin_gain) + rustle + flicks


def record(dry):
    """Linear response: each port adds its colour, then a low-pass filter limits the band."""
    heard = np.array([colour(dry[0], LEFT_COLOUR), colour(dry[1], RIGHT_COLOUR)])
    band_limit = signal.firwin(511, EDGE_HZ, window=("kaiser", 9), fs=SR)
    return signal.oaconvolve(heard, band_limit[None], "same")


dry = scene()
out = record(dry)
generate_wav(out)
```